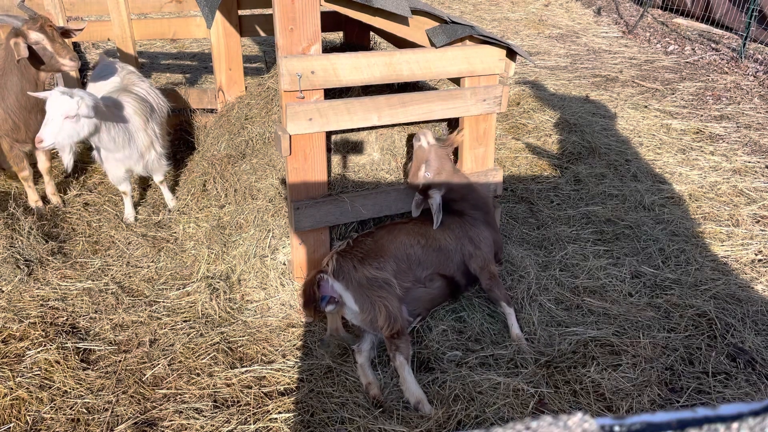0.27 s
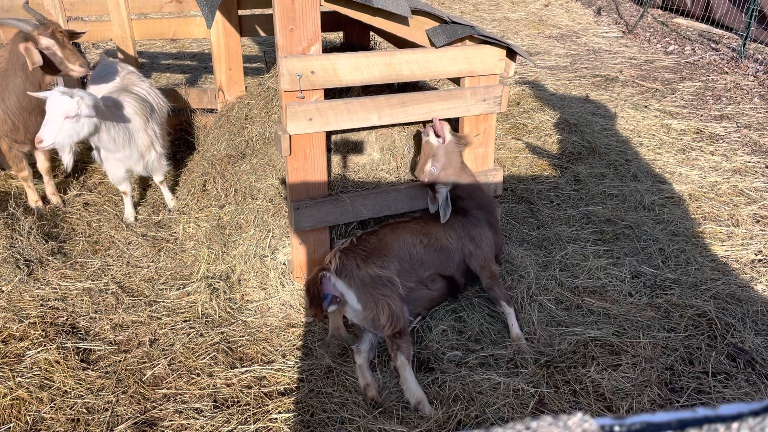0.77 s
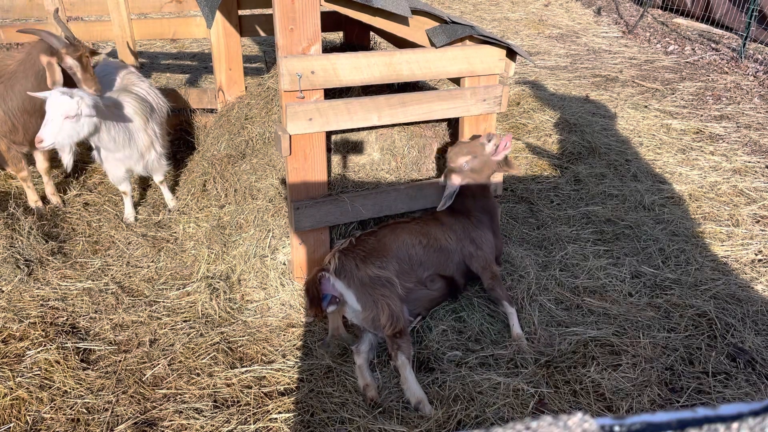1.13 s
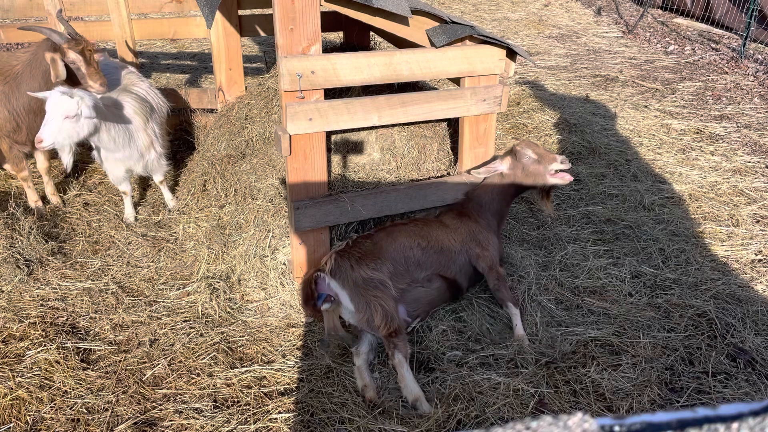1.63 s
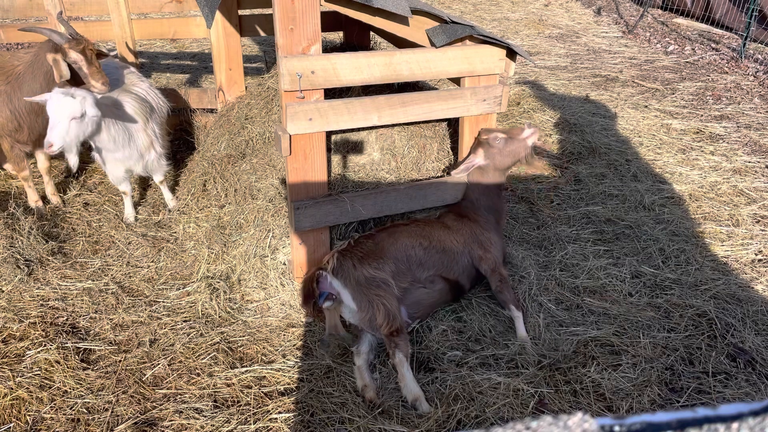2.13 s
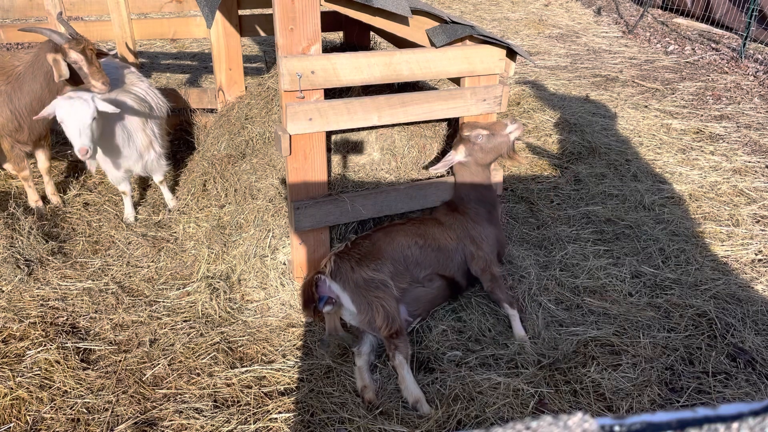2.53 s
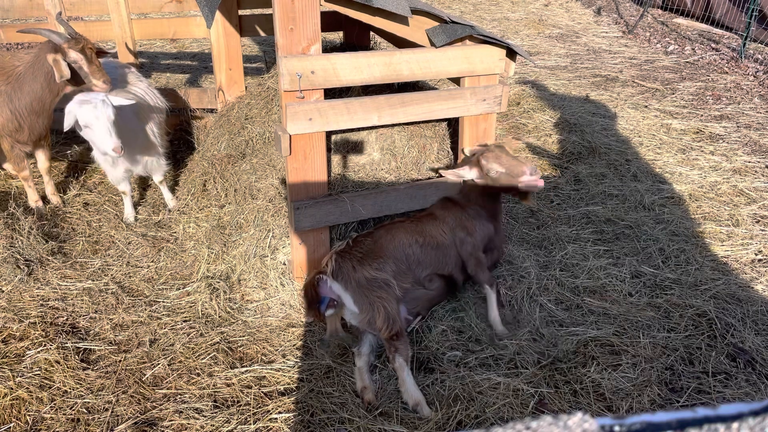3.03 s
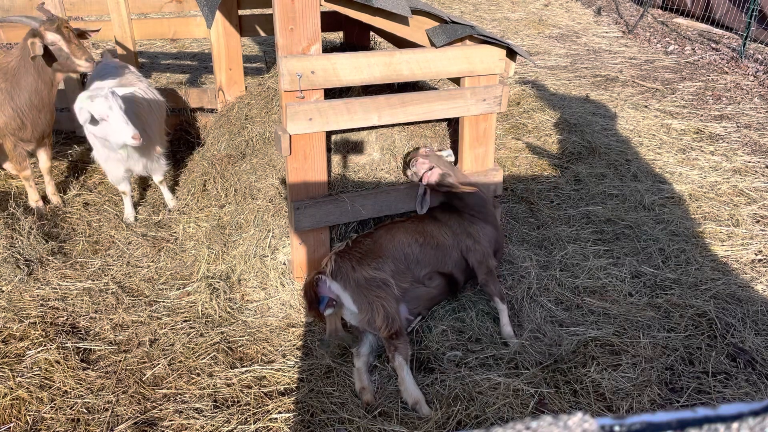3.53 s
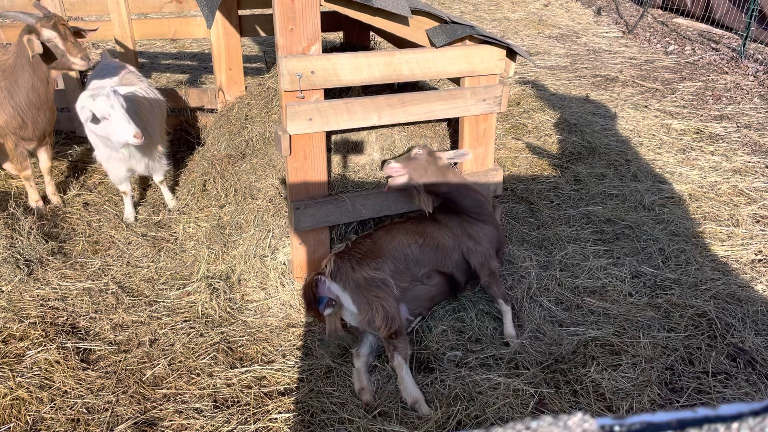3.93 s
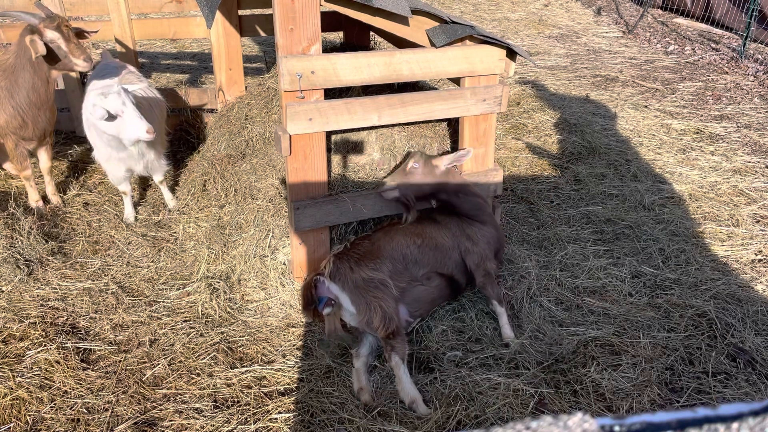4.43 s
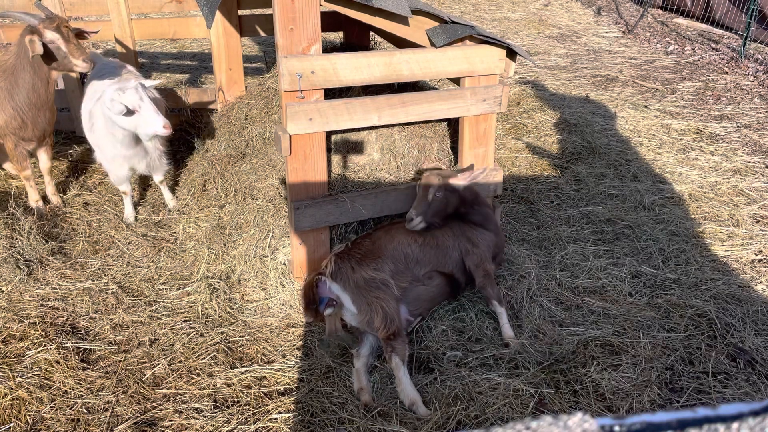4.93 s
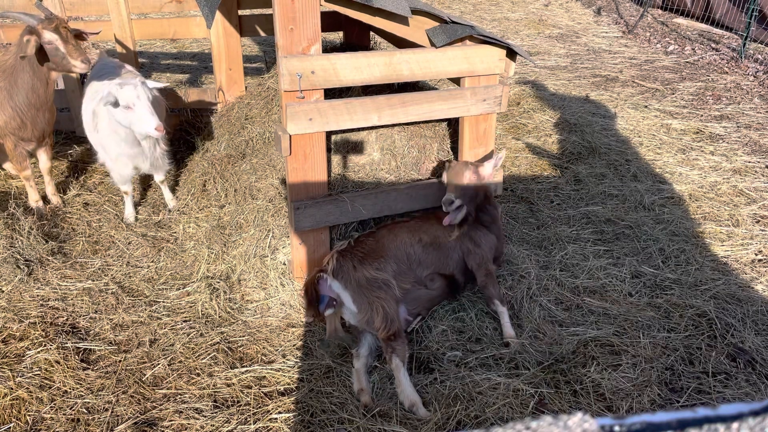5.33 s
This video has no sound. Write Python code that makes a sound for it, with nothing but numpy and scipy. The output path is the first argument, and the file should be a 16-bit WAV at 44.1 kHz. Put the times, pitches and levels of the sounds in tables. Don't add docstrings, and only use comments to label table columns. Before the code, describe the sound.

Three raspy, almost scream-like goat cries a few metres away outdoors, with wind rumble, faint straw ticks and tiny bird peeps.

```python
import sys
import numpy as np
from scipy import signal
from scipy.fft import rfft, irfft, next_fast_len
from scipy.io import wavfile
from scipy.ndimage import uniform_filter1d

SR = 44100
rng = np.random.default_rng(int(sys.argv[2]) if len(sys.argv) > 2 else 0)


def put_to_file(sound):
    columns = np.atleast_2d(sound).T
    safe = np.clip(columns, -1, 1)
    whole_steps = np.round(safe * 32767)
    wavfile.write(sys.argv[1], SR, whole_steps.astype(np.int16))


def convert_level_to_amplitude(level_db):
    exponent = np.asarray(level_db, float) / 20
    return 10 ** exponent


N = 246519

# [f/Hz, level/dB per Hz]
WIND = [(15, -42.5), (25, -4), (58, 2), (81, -7), (224, -13), (325, -16), (442, -28.5), (492, -18.5),
        (600, -31), (780, -68.5), (1320, -120)]
# [t/s, level/dB]
GUSTS = [(0, -47), (.3, -52), (.47, -41), (.59, -50.5), (.86, -58), (1.55, -56), (2.13, -50.5),
         (2.22, -46.5), (2.61, -55.5), (2.88, -51), (3.18, -62.5), (3.5, -52.5), (4.0, -62), (4.25, -62),
         (4.95, -49.5), (5.11, -54), (5.59, -54)]
# [t/s, peak/dB]
BUFFETS = [(0.145, -36), (0.279, -46), (0.352, -37), (0.388, -40), (0.471, -43.5), (0.823, -42.5),
           (1.753, -41.5), (2.036, -46), (2.069, -37), (2.149, -26), (2.172, -35.5), (2.258, -38.5),
           (2.29, -40), (2.358, -50.5), (2.395, -41.5), (2.637, -47), (2.825, -36), (2.924, -31.5),
           (3.571, -36.5), (3.616, -41), (4.236, -47.5), (4.756, -31.5), (4.869, -42.5), (4.905, -49),
           (4.936, -29.5), (4.965, -37.5), (5.139, -41.5)]

# [f/Hz, level/dB per Hz]
YARD = [(120, -36.5), (200, -17.5), (392, -22.5), (728, -10), (1620, -22.5), (2380, -35.5), (5490, -51.5),
        (6960, -41), (12900, -57.5), (15500, -45.5)]
# [t/s, level/dB]
YARD_DB = [(0, -63.5), (2, -66.5), (2.7, -66), (4.3, -68.5), (5.1, -68)]
# [f/Hz, level/dB per Hz]
STRAW = [(1180, -42), (2000, -12.5), (7230, -4.5), (8580, -13.5), (10600, -2), (12800, -23.5),
         (15500, -1.5)]
# [t/s, peak/dB, fall on either side/dB per s]
SHUFFLES = [(.048, -88.5, 400), (.178, -86, 194), (.39, -89, 201), (1.598, -84, 59.5), (1.755, -71, 380),
            (2.092, -71, 1500), (2.12, -85, 96.5), (2.572, -69, 84.5), (4.409, -94, 65.5),
            (4.788, -80.5, 498.5), (4.954, -91, 349)]
# [t/s, peak/dB, body/dB]
TICKS = [
    (1.7365, -53.5, -15),
    (1.7524, -53, 1),
    (2.0387, -70.5, 10),
    (2.0891, -61.5, 9.5),
    (2.0922, -54, 3),
    (2.2842, -68, -7),
    (2.551, -49.5, -19.5),
]
# [t/s, length/s, start f/Hz, end f/Hz, level/dB]
PEEPS = [
    (0.034, 0.017, 6800, 7200, -79),
    (0.143, 0.055, 7900, 7300, -69),
    (.165, 0.066, 7350, 7300, -71),
    (0.222, .025, 7500, 7800, -70),
    (4.555, .015, 5300, 5880, -75.5),
    (4.59, 0.022, 5720, 5750, -82),
    (4.785, 0.014, 6310, 8020, -68),
]

# [start t/s, end t/s, opening pitch f/Hz, a crest of the waver t/s, waver depth/share]
BLEATS = [
    (0.391, 1.552, 396.9, 1.248, .013),
    (2.762, 4.012, 329.2, 3.5, .036),
    (5.1, 5.634, 448.5, 5.17, 0.012),
]
# [t/s, peak/dB]
CREAKS = [(0.4111, -43), (0.4193, -40), (0.4444, -43), (2.7723, -49), (2.778, -49.5), (2.7844, -46),
          (2.7921, -42), (2.803, -42.5), (2.812, -45.5), (5.108, -39), (5.115, -33.5), (5.1204, -50),
          (5.1276, -43), (5.1356, -28)]
# [f/Hz, width/Hz, level/dB]
SLAP_RING = [(2772, 300, -5.5), (3640, 250, -5), (4446, 610, -12.5), (6400, 800, -16), (7200, 690, -8)]
# [t/s, chaos: 0 steady, 1 hoarse, over 1 creaky]
SLIPS = [(.38, 1.35), (.49, .9), (.88, .4), (1.14, .05), (1.165, .1), (1.227, .018), (1.295, .06),
         (1.34, .015), (1.478, .06), (2.7, 1.4), (2.855, .7), (3.1, .8), (3.39, .17), (3.52, .09),
         (3.645, .45), (3.75, .82), (5.0, 1.35), (5.14, 1.0), (5.168, .25), (5.33, .82)]
# [t/s, level/dB]
BREAKS = [
    (1.135, -10.5),
    (1.221, -1),
    (3.552, -6),
    (5.34, -4),
]
# [t/s, effort/dB, throat boom/dB, facing the camera/dB]
EFFORT = [
    [(.49, -49, 0.5, -7), (.53, -23, 0.5, -17.5), (.7, -21.5, 4.5, -18), (.86, -22, 3.5, -20.5),
     (.9, -25.5, 5, -14), (1.06, -25.5, 0, -19), (1.18, -22.5, 7, -20), (1.38, -24, 0.5, -19),
     (1.5, -35.5, 9, -26.5)],
    [(2.845, -49, 0, -12.5), (2.875, -30, 3, -20), (2.96, -25.5, 5, -17), (3.12, -20.5, -3.5, -11),
     (3.4, -21.5, 0, -11), (3.54, -22.5, 4.5, -12), (3.61, -19.5, -2, -22), (3.85, -28, -8.5, -28.5),
     (3.995, -44.5, 8, -27)],
    [(5.145, -32, -5, -19), (5.19, -27.5, 5.5, -16), (5.27, -20.5, 2.5, -20.5), (5.36, -21, -5.5, -15.5),
     (5.44, -21.5, 0, -10.5), (5.59, -20.5, 1, -9.5)],
]
# [t/s, pitch f/Hz, fundamental level/dB]
FOLDS = [
    [(.5, 370.8, -26), (.56, 515.1, -34), (.9, 528.7, -38), (1.14, 479.9, -39.5), (1.18, 433.8, -44.5),
     (1.41, 416.8, -44.5), (1.438, 393, -51.5), (1.472, 382.8, -55), (1.535, 260.5, -53.5)],
    [(2.84, 481.8, -43), (2.96, 509.9, -32.5), (3.26, 608.5, -32), (3.33, 576.1, -44), (3.37, 476.1, -41),
     (3.5, 494.5, -33), (3.72, 480, -38), (3.76, 585.9, -36), (3.99, 572, -37.5)],
    [(5.148, 507.5, -40.5), (5.178, 447.1, -40), (5.25, 423.9, -48), (5.3, 487.6, -37), (5.4, 564.1, -33.5),
     (5.59, 580.2, -36.5)],
]
# [t/s, throat f/Hz, mouth f/Hz, lips rounded/dB, cheek f/Hz]
TRACT = [
    [(.42, 855, 1946, -4.5, 4320), (.54, 858, 2173, 0.5, 4385), (.74, 847, 1965, 2, 4887),
     (.87, 893, 1970, 2.5, 4824), (1.08, 938, 2045, 3, 4058), (1.19, 880, 1812, 9.5, 3982),
     (1.25, 890.6, 2037, 8, 4210), (1.42, 932, 2010, 12, 4043), (1.49, 897.5, 1990, 7, 4290)],
    [(2.8, 803, 1852, 5, 4390), (2.96, 964, 2080, 6.5, 4750), (3.3, 920, 1962, 5, 4544),
     (3.42, 923, 2116, 3, 4580), (3.54, 950, 2084, -1, 4552), (3.62, 976, 1969, 3, 4312),
     (3.85, 850, 2228, 1.5, 3943), (3.98, 872, 1790, 10.5, 4060)],
    [(5.13, 830, 1490, -3, 4670), (5.19, 832, 2094, -4, 5084), (5.26, 900, 2111, 2.5, 4730),
     (5.37, 871, 1930, -2.5, 4320), (5.44, 1049, 2096, 0.5, 4587), (5.59, 981, 1970, 3.5, 4590)],
]
# [t/s, palate f/Hz, lips f/Hz, sinus hollow f/Hz, hollow depth/share]
PALATE = [
    [(.42, 2890, 3650, 4833, .6), (.52, 2927, 3390, 4630, .5), (.61, 2750, 3412, 5117, .8),
     (.66, 2865, 3600, 5600, .7), (.78, 2797, 3668, 5200, .3), (.87, 2764, 3600, 5603, .8),
     (.92, 2890, 3896, 5163, 0.86), (1.03, 2734, 3620, 5450, .9), (1.45, 2995, 3643, 5453, 0.79)],
    [(2.8, 2800, 3700, 5060, 0.53), (2.9, 2413, 3650, 5600, 0.89), (2.98, 2645, 3373, 5500, .85),
     (3.13, 3000, 3780, 5336, 0.98), (3.2, 2860, 3615, 5200, .5), (3.5, 2958, 3750, 5600, .4),
     (3.6, 3350, 3850, 5480, .4), (3.72, 3042, 3577, 5430, .4), (3.95, 2800, 3700, 5420, .4)],
    [(5.12, 2830, 3830, 5420, .5), (5.2, 2817, 3710, 5247, 1), (5.26, 2649, 3610, 5510, .85),
     (5.32, 2454, 3568, 5400, 0.77), (5.37, 3067, 3870, 5136, .4), (5.45, 3084, 3833, 5206, .7),
     (5.59, 2950, 3647, 5264, .7)],
]
# [t/s, level/dB]
CHEEK = [(.5, -12), (.7, -13), (.87, -9.5), (1.0, -9.5), (1.2, -12.5), (1.5, -13.5), (2.85, -8.5),
         (3.1, -7), (3.3, -10.5), (3.5, -11), (3.7, -14.5), (4.0, -15.5), (5.15, -4.5), (5.24, -8.5),
         (5.33, -5), (5.45, -11.5), (5.59, -10.5)]
# [f/Hz, width/Hz, depth/share]
WEAK_BAND = [(1300, 360, 0.68)]
# [f/Hz, width/Hz, level/dB]
BREATH = [(5300, 1100, 10), (5990, 500, 7.5), (7080, 2200, 11.5), (8770, 1500, -18)]
# [f/Hz, level/dB per Hz]
FIZZ = [(8300, -45.5), (9200, -0.5), (10500, -0.5), (11600, -4.5), (12300, -30.5), (13600, -30.5),
        (14400, -1.5), (15600, -4.5)]

# [t/s, lag/ms]
GROUND = [(.5, 1.05), (.82, 1.2), (1.0, 1.9), (1.15, 2), (1.6, 2.3), (2.8, 1), (3.0, 1.7), (3.5, 1.5),
          (3.95, .9), (5.14, 0.84), (5.35, 1.1), (5.59, 1.3)]
# [lag t/s, left level/dB, right level/dB]
BOARDS = [
    (.0031, -18.5, -26),
    (.0047, -32.5, -24),
    (.0074, -14.5, -30.5),
    (0.011, -29, -9.5),
]
# [f/Hz, fade t/s]
SHEDS = [(300, 0.53), (900, 1.1), (2000, 1.05), (4000, 0.52), (8000, 1.4)]

# [f/Hz, lead/radians]
PORT_PHASE = [(0, 0), (1150, -.3), (1500, 1.55), (2400, .7), (3100, 0), (4200, .6), (5500, 1.5), (6100, .2),
              (6800, 1.25), (8000, 2.05), (8600, np.pi), (10700, 2 * np.pi), (12800, 3 * np.pi),
              (15000, 4 * np.pi)]
# [f/Hz, level/dB]
PORT_BALANCE = [(200, 0), (700, -2), (1500, 0), (3100, 3), (4300, 5), (5500, -5), (6100, -11), (6900, -4),
                (8000, -3), (8600, 0)]


def evened(x, size=None):
    if size:
        power = uniform_filter1d(uniform_filter1d(x ** 2, size), size)
    else:
        power = np.mean(x ** 2)
    return x / np.sqrt(abs(power) + 1e-20)


def read(points, hz):
    f, value = np.transpose(points)
    return np.interp(np.log(hz + 1), np.log(f + 1), value)


def curve(points, t):
    return np.interp(t, *np.transpose(points))


def columns_at(rows, t):
    s, *columns = np.transpose(rows)
    return [np.interp(t, s, column) for column in columns]


def held(rows, t):
    s, value = np.transpose(rows)
    return uniform_filter1d(value[np.searchsorted(s, t) - 1], size=round(.01 * SR))


def add(mix, s, sound):
    part = mix[round(s * SR):][:len(sound)]
    part += sound[:len(part)]


def cut_beyond(x, order, hz, kind):
    return signal.sosfilt(signal.butter(order, hz, kind, fs=SR, output="sos"), x)


def resonate(x, hz, width):
    turn = np.exp(2j * np.pi * np.cumsum(hz * np.ones(len(x))) / SR)
    r = np.exp(-np.pi * width / SR)
    smooth = signal.lfilter([(1 - r) ** 2], [1, -2 * r, r ** 2], x / turn + 1e-18)
    return 2 * (turn * smooth).real


def wander(length, hz):
    return evened(signal.lfilter(*signal.butter(2, hz / SR * 2), rng.standard_normal(length)))


def noise(spectrum, same, patchy_db):
    frames, hz = N // 256 + 5, np.fft.rfftfreq(1024, 1 / SR)
    a, b, c, d, patches = rng.standard_normal((frames, 513, 5)).T
    patches = evened(uniform_filter1d(uniform_filter1d(patches, 10, 0), 10, 1))
    same = np.clip(same, -1, 1)
    left = a + 1j * b
    right = same * left + np.sqrt(1 - same ** 2) * (c + 1j * d)
    colour = convert_level_to_amplitude(read(spectrum, hz)[:, None] + patchy_db * patches)
    sound = signal.istft(np.array([left, right]) * colour, nperseg=1024, noverlap=768)[1]
    return evened(sound[:, :N])


def buffet(top_hz):
    t = np.arange(3000) / SR
    turns = 62 * t + top_hz * 0.0068 * (1 - np.exp(-t / 0.0079))
    swell = np.exp(-t / .017) * (1 - np.exp(-t / 0.0065))
    return np.sin(2 * np.pi * turns) * swell * 2.3


def wind():
    small = (rng.random((3, N)) < 45 / SR) * rng.standard_normal((3, N))
    pushes = small[0] + .55 * small[1:]
    patter = signal.oaconvolve(pushes, buffet(200)[None], axes=1)[:, :N]
    air = 0.71 * noise(WIND, .72, patchy_db=-3.5) + 0.7 * evened(patter)
    out = convert_level_to_amplitude(curve(GUSTS, np.arange(N) / SR) + 0.5 * wander(N, 18)) * air
    leans = rng.uniform(-1.7, 1, (len(BUFFETS), 2))
    for (s, db), lean in zip(BUFFETS, leans):
        for side in (0, 1):
            push = buffet(320 * (1 + .045 * lean[side]))
            add(out[side], s - .002, convert_level_to_amplitude(db - 4.0 + 1.6 * lean[side]) * push)
    return out


def straw():
    t = np.arange(N) / SR
    stir = convert_level_to_amplitude(-105) + sum(convert_level_to_amplitude(db - fall * abs(t - s)) for s, db, fall in SHUFFLES)
    return convert_level_to_amplitude(6.5) * stir * noise(STRAW, 0.23, patchy_db=3.5)


def ticks():
    out, t = np.zeros(N), np.arange(400) / SR
    for s, db, body_db in TICKS:
        burst = rng.standard_normal(400) * np.exp(-t / 0.011)
        snap = .5 * np.diff(burst, prepend=0)
        body = convert_level_to_amplitude(body_db) * resonate(burst, 1017, 4800)
        add(out, s, convert_level_to_amplitude(db - 2.0) * (snap + body))
    return out


def birds():
    out = np.zeros(N)
    for s, length, start_hz, end_hz, db in PEEPS:
        glide = np.linspace(start_hz, end_hz, round(length * SR))
        whistle = np.sin(2 * np.pi * np.cumsum(glide) / SR)
        add(out, s, convert_level_to_amplitude(db) * whistle * np.hanning(len(glide)))
    return out


def yard():
    murmur = convert_level_to_amplitude(curve(YARD_DB, np.arange(N) / SR)) * noise(YARD, -0.36, patchy_db=1.0)
    hiss = convert_level_to_amplitude(-87.5) * rng.standard_normal(N)
    return murmur + straw() + ticks() + birds() + hiss


def fold_beats(turns, stumble, hz):
    beats = np.zeros(len(turns))
    for k in range(2, 40):
        beats += np.cos(2 * np.pi * k * (turns + .45 * stumble)) * (k * hz < SR / 2.5)
    return evened(beats)


def fizzle(air):
    hz, _, z = signal.stft(air, SR, nperseg=256)
    patches = uniform_filter1d(rng.standard_normal(z.shape), size=4, axis=0)
    patches = evened(uniform_filter1d(patches, size=16, axis=1))
    colour = convert_level_to_amplitude(read(FIZZ, hz)[:, None] + 7 * patches.clip(-3, 1))
    return evened(signal.istft(z * colour, SR, nperseg=256)[1][:len(air)], size=6000)


def open_mouth(drive, t, tract, palate, effort_db, dull):
    _, mouth_hz, mouth_db, cheek_hz = columns_at(tract, t)
    palate_hz, lips_hz = columns_at(palate, t)[:2]
    palate_hz = palate_hz * (1 + .036 * wander(len(t), 15))
    lips_hz = lips_hz * (1 + .036 * wander(len(t), 15))
    mouth_db = mouth_db + 0.56 * np.minimum(effort_db + 40.5, 0)
    gape = convert_level_to_amplitude(mouth_db) * dull * resonate(drive, mouth_hz, 420)
    gape += resonate(drive, palate_hz, 570) - convert_level_to_amplitude(-3.5) * resonate(drive, lips_hz, 880)
    gape += convert_level_to_amplitude(curve(CHEEK, t)) * dull * resonate(drive, cheek_hz, 550)
    at = np.arange(len(t))
    lag = curve(GROUND, t) * SR / 1000
    return gape + convert_level_to_amplitude(-11.5) * np.interp(at - lag, at, gape)


def bleat(call, effort, tract, folds, palate):
    start, end, opening_hz, crest_s, waver = call
    t = np.arange(start, end, 1 / SR)
    catch = [(start, -80), (start + .025, -55)]
    effort_db = curve(catch + [row[:2] for row in effort] + [(end, -80)], t)
    boom_db, facing_db = columns_at(effort, t)[1:]
    throat_hz = columns_at(tract, t)[0]
    hollow_hz, hollow = columns_at(palate, t)[2:]
    murmur = [(start, opening_hz, -49.5)]
    hz, base_db = columns_at(murmur + folds, t)
    base_db = np.minimum(base_db, effort_db + 14)

    chaos = held(SLIPS, t)
    noisy = np.clip(chaos, 0, 1)
    creaky = np.clip(4 * (chaos - 1), 0, 1)
    dull = convert_level_to_amplitude(-10 * creaky)
    effort_db = effort_db + sum(db * np.exp(-((t - s) / .0034) ** 2) for s, db in BREAKS)
    tremble = np.clip(2 - 5 * chaos, 0, 1) * np.cos(2 * np.pi * 8.1 * (t - crest_s))
    hz = hz * (1 + waver * tremble)
    missed_hz = abs(throat_hz - hz * np.round(throat_hz / hz))
    boom_db = boom_db - 10.5 * missed_hz / 100 * np.clip(1 - 8 * chaos, 0, 1)

    stumble = np.cumsum(hz * chaos * wander(len(t), 350)) / SR
    turns = np.cumsum(hz) / SR
    beats = fold_beats(turns, stumble, hz)
    puffs = evened((0.26 + np.exp(-(turns % 1) / 0.16)) * rng.standard_normal(len(t)))
    drive = np.sqrt(1 - noisy ** 2) * beats + noisy * puffs
    airy = drive + .9 * np.sqrt(chaos) * puffs
    base = np.sqrt(2) * np.cos(2 * np.pi * (turns + .15 * stumble))
    smear = evened(resonate(puffs, hz * 1.08, 150))

    throat = evened(resonate(drive, throat_hz, 208), size=2000)
    gape = evened(open_mouth(drive, t, tract, palate, effort_db, dull), size=2000)
    breath = sum((-1) ** k * convert_level_to_amplitude(db) * resonate(airy, f, w) for k, (f, w, db) in enumerate(BREATH))
    breath = evened(breath, size=2000)
    upper = convert_level_to_amplitude(boom_db) * throat + convert_level_to_amplitude(0.8) * gape + convert_level_to_amplitude(facing_db + 5.0) * dull * breath
    upper = upper - sum(np.clip(share, 0, 1) * resonate(upper, f, w) for f, w, share in WEAK_BAND)
    upper = upper - np.clip(hollow, 0, 1) * resonate(upper, hollow_hz, 700)
    upper = cut_beyond(upper, 10, 9000, "low")
    fizz_db = -24 + 0.8 * (facing_db + 15.5) - 3.0 * (t - start)
    upper = upper + convert_level_to_amplitude(fizz_db) * fizzle(airy)
    valley = evened(resonate(rng.standard_normal(len(t)), 1450, 820))
    upper = upper + convert_level_to_amplitude(-10.5 - 0.66 * (facing_db + 15)) * noisy * dull * valley

    lumps_db = 1.3 * wander(len(t), 99).clip(-2, 2)
    swells_db = 1.8 * wander(len(t), 9.9).clip(-2, 2)
    throb = convert_level_to_amplitude(noisy * (lumps_db + swells_db))
    low = base * (1 - 1.1 * creaky) + (.16 * chaos + 0.76 * creaky) * smear
    voice = convert_level_to_amplitude(effort_db - 0.64) * throb * upper + convert_level_to_amplitude(base_db + 3.5) * low
    voice = voice * (1 + .8 * creaky * np.cos(2 * np.pi * turns / 3))
    voice = cut_beyond(voice, 8, 335, "high")
    return start, voice * signal.windows.tukey(len(t), .02)


def fold_slap():
    t = np.arange(500) / SR
    ring = sum(convert_level_to_amplitude(db) * np.exp(-np.pi * w * t) * np.sin(2 * np.pi * f * t) for f, w, db in SLAP_RING)
    return 2.0 * ring * (1 - np.exp(-t / .0007))


def goat():
    out = np.zeros(N)
    for tables in zip(BLEATS, EFFORT, TRACT, FOLDS, PALATE):
        add(out, *bleat(*tables))
    slap = fold_slap()
    for s, db in CREAKS:
        add(out, s, convert_level_to_amplitude(db - 2.5) * slap)
    return out


def boards(x):
    out = np.zeros((2, N))
    for lag, *dbs in BOARDS:
        for side, db in enumerate(dbs):
            add(out[side], lag, convert_level_to_amplitude(db) * x)
    return out


def sheds(x):
    taps = np.zeros((2, SR))
    at = np.arange(900, SR - 20, 20) + rng.integers(0, 20, (2, (SR - 901) // 20))
    np.put_along_axis(taps, at, rng.choice([-1., 1.], at.shape), 1)
    hz, t, z = signal.stft(taps, SR, nperseg=256)
    fade = convert_level_to_amplitude(-60 * t / read(SHEDS, hz)[:, None])
    tail = signal.istft(z * fade, SR, nperseg=256)[1]
    tail = tail / np.linalg.norm(tail[0])
    return convert_level_to_amplitude(-27) * signal.fftconvolve(x[None], tail, axes=1)[:, :N]


def scene():
    voice = goat()
    return voice + boards(voice) + sheds(voice) + yard() + wind()


def band_limit(x):
    return signal.sosfilt(signal.butter(12, 15700, fs=SR, output="sos"), x)


def record(dry):
    size = next_fast_len(N + 8192)
    hz = np.fft.rfftfreq(size, 1 / SR)
    lead = np.interp(hz, *np.transpose(PORT_PHASE))
    lead -= .45 * np.sin(2 * lead) * (hz > 6500)
    half = convert_level_to_amplitude(read(PORT_BALANCE, hz) / 2) * np.exp(.5j * lead)
    ports = np.array([half, 1 / half]) * (hz < 15780)
    x = irfft(rfft(dry, size, axis=1) * ports, size, axis=1)[:, :N]
    x = cut_beyond(x, 2, 38, "high")
    ceiling = .8
    x = x / ceiling
    x = ceiling * np.tanh(x * (1 + x ** 2 / 3))
    return band_limit(x)


dry = scene()
out = record(dry)
put_to_file(out)
```